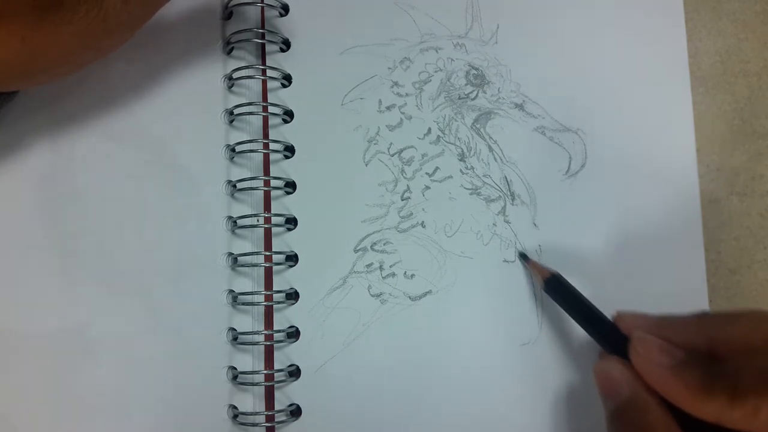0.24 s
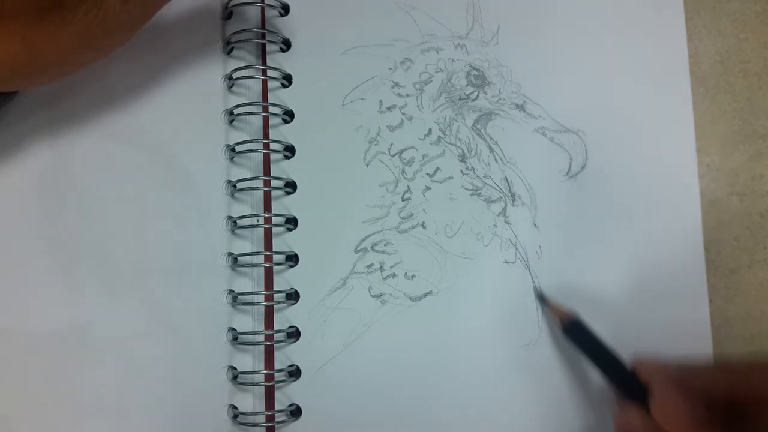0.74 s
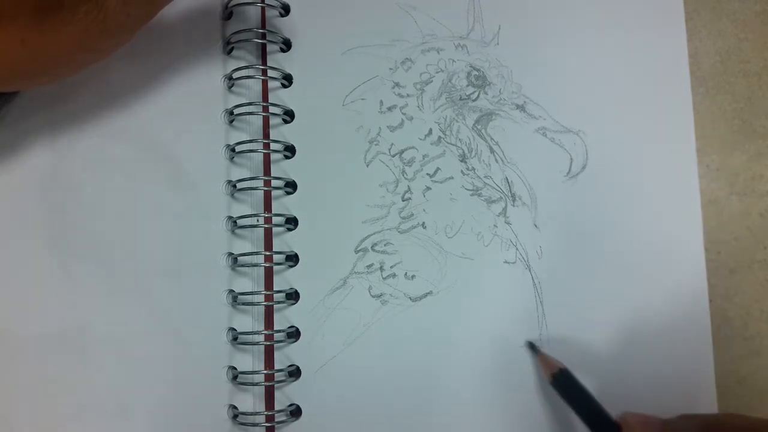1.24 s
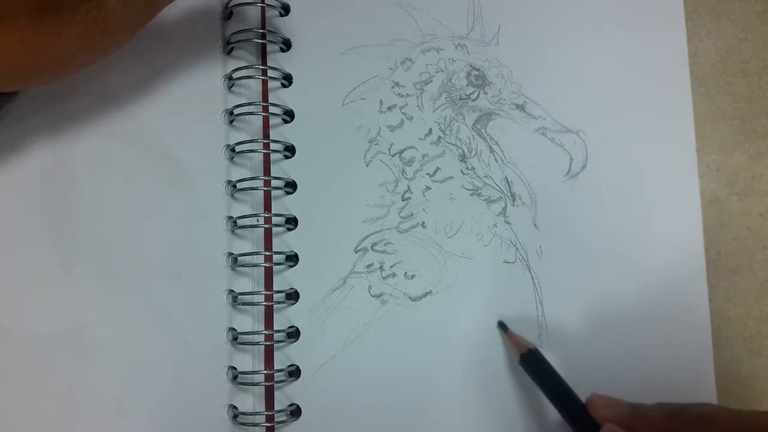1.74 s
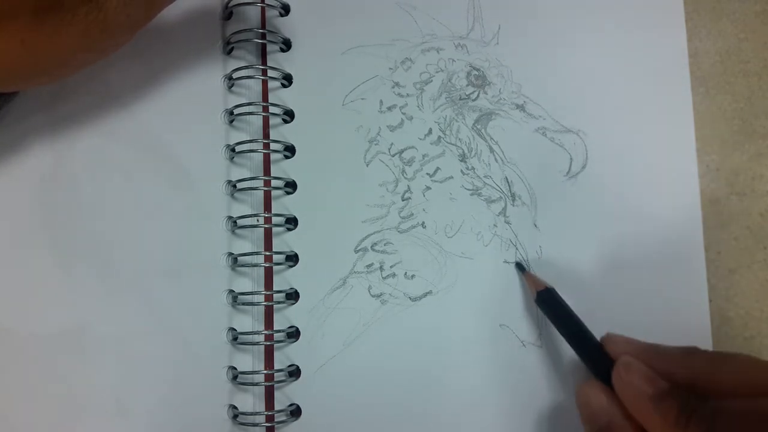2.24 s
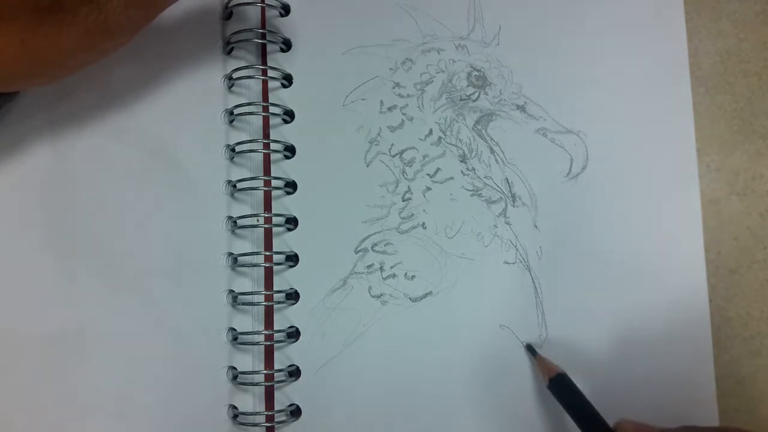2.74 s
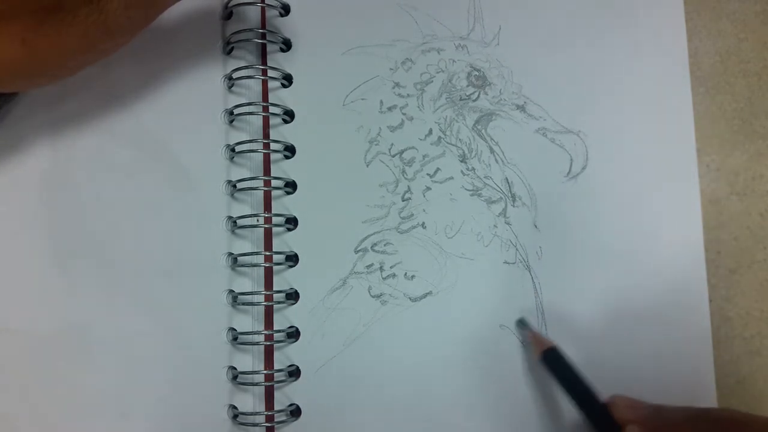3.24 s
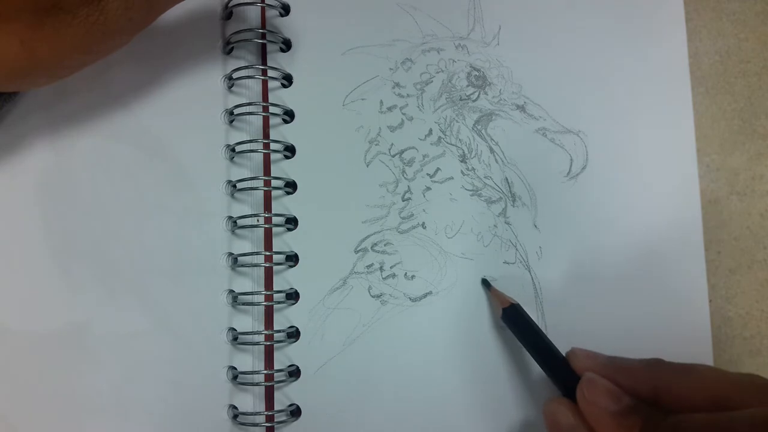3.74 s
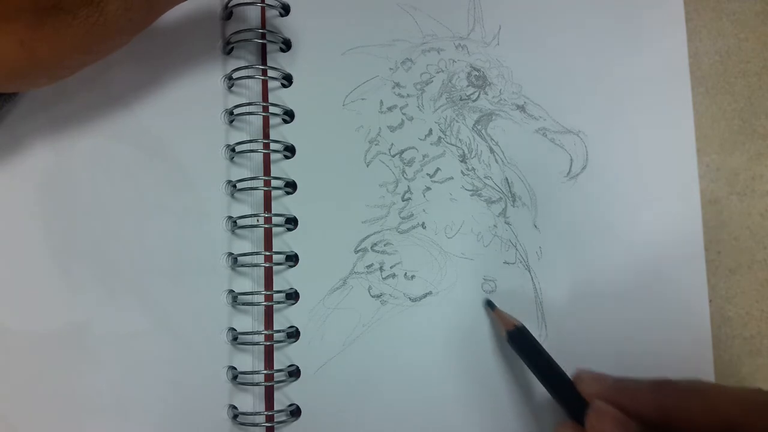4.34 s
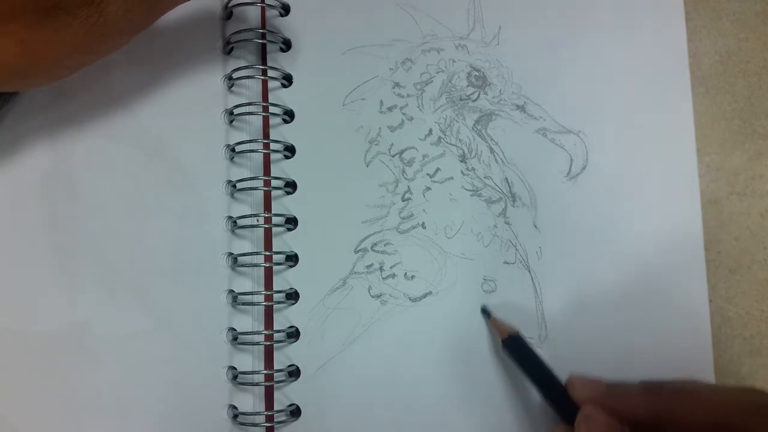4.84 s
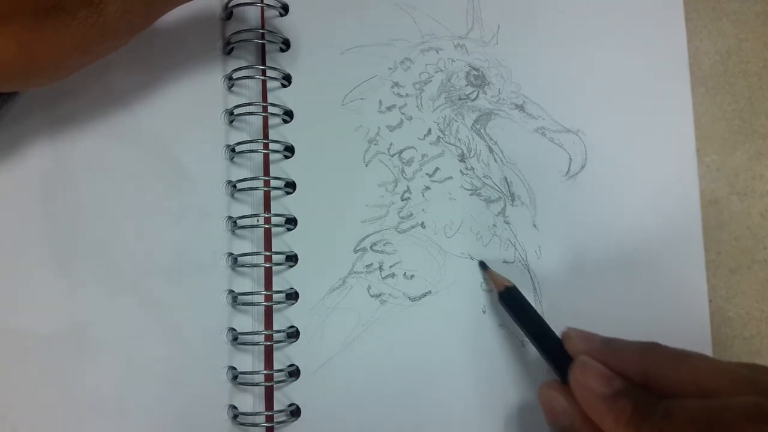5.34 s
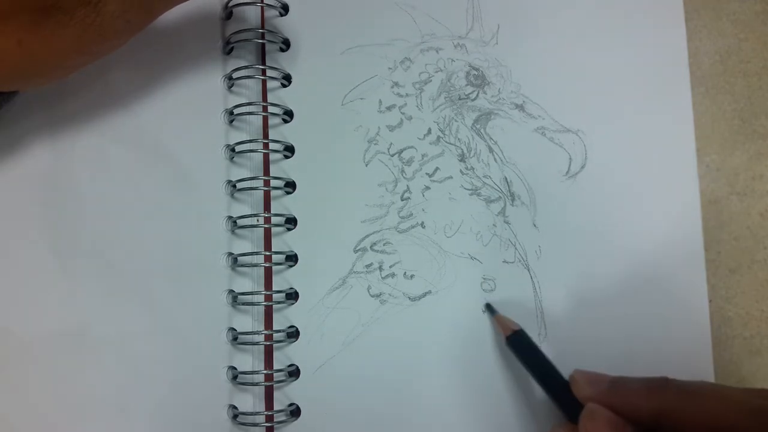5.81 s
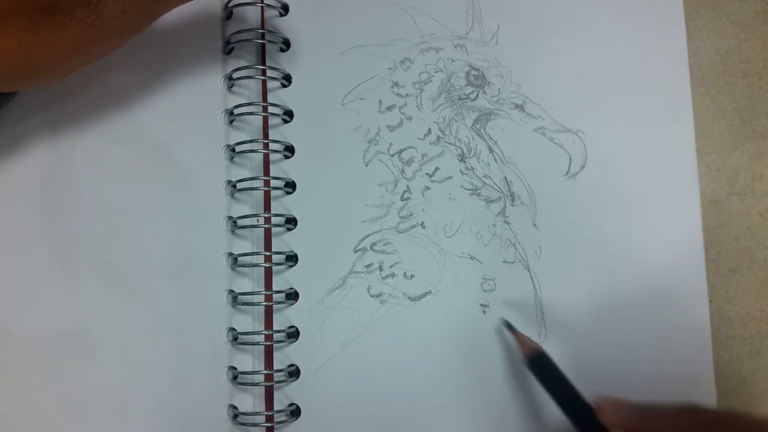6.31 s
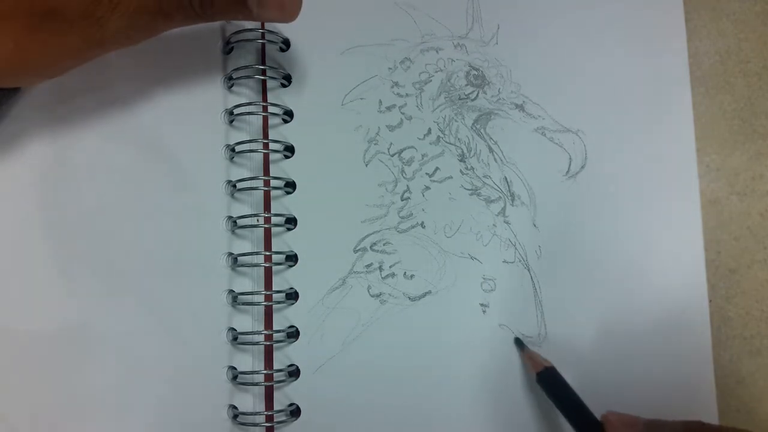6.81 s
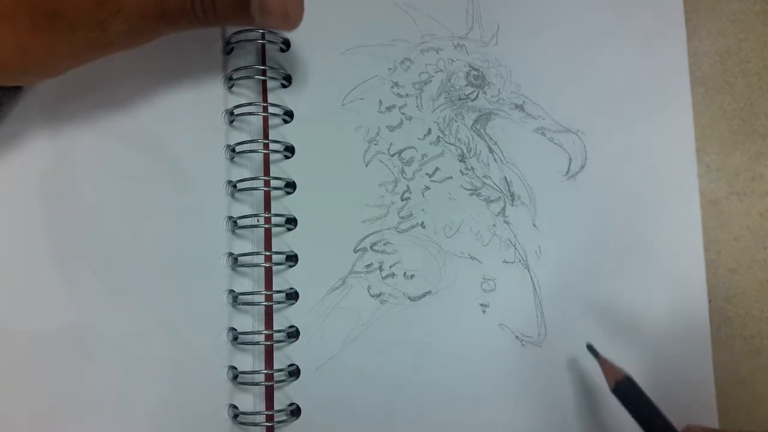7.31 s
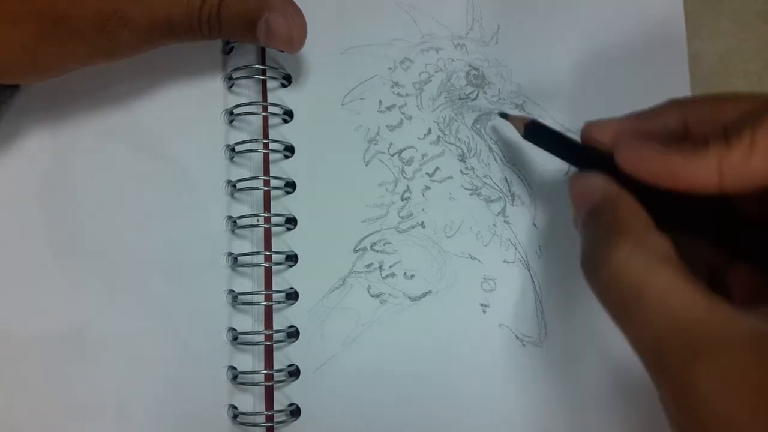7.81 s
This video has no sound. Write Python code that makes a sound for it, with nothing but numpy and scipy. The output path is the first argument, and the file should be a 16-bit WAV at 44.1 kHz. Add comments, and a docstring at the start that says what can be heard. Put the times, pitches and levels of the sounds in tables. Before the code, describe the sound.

Pencil lead whispers over textured paper in short, uneven strokes, close to a small microphone. A longer, stronger scratch stands out before one second and another after two; then come quicker, lighter dabs. The hand brushes softly over the page and a few tiny ticks sound. A low fan hum and soft airy flutter continue throughout the small quiet room.

```python
"""A graphite pencil sketches in short strokes on a page of a spiral-bound book, close to a small microphone.
The lead slips over the paper's tooth: noise filtered into a fine hiss, its resonances shifting
from stroke to stroke, over a dull thrum of the pad. The hand slides on the page as a soft noise rustle,
and a few light ticks ring as damped noise bursts. Behind it all is a quiet room with a short noise tail,
a fan made of filtered noise, and wavering tones of motor and mains."""
import sys
import numpy as np
from scipy import signal
from scipy.fft import rfft, irfft, next_fast_len
from scipy.io import wavfile

SR = 44100
rng = np.random.default_rng(int(sys.argv[2]) if len(sys.argv) > 2 else 0)


def dump_mix(stems):
    """Bounce the given channels to the path in sys.argv[1] as a 16-bit WAV at rate SR."""
    frames = np.atleast_2d(stems).T  # one column per channel
    limited = np.clip(frames, -1, 1)  # hard clip at full scale
    pcm = np.round(limited * 32767).astype(np.int16)
    wavfile.write(sys.argv[1], SR, pcm)


N = 355840  # samples

# Pencil strokes close to the microphone.
# Each row: start in seconds, length in seconds, level in dB before the hiss and thrum offsets.
PENCIL_STROKES = [(-0.048, 0.097, -75), (0.02, 0.17, -70), (0.251, 0.19, -64.5), (0.4, 0.23, -68),
                  (0.631, 0.41, -49.5), (1, 0.207, -68.5), (1.156, 0.149, -65.0), (1.269, 0.158, -60),
                  (1.381, 0.15, -68.5), (1.496, 0.22, -57.5), (1.668, 0.14, -68.5), (1.783, 0.06, -75.0),
                  (2.043, 0.27, -66.5), (2.233, 0.165, -71.5), (2.367, 0.46, -55), (2.72, 0.15, -63),
                  (2.971, 0.11, -60.5), (3.05, 0.16, -69.0), (3.176, 0.15, -59), (3.578, 0.037, -69),
                  (3.587, 0.16, -68), (3.72, 0.17, -63.5), (3.893, 0.15, -62.5), (3.974, 0.1, -70),
                  (4.002, 0.2, -59), (4.129, 0.2, -62), (4.286, 0.11, -64.5), (4.542, 0.059, -72.5),
                  (4.598, 0.13, -69.5), (4.708, 0.083, -68.5), (4.795, 0.093, -72.0), (4.888, 0.11, -71),
                  (4.972, 0.16, -67), (5.088, 0.045, -68.0), (5.124, 0.107, -67.5), (5.214, 0.12, -66.5),
                  (5.312, 0.14, -60), (5.433, 0.1, -62.5), (5.526, 0.058, -70.0), (5.54, 0.18, -73),
                  (5.805, 0.144, -74), (5.907, 0.098, -64.5), (5.997, 0.11, -66.5), (6.084, 0.11, -64),
                  (6.168, 0.1, -69.0), (6.342, 0.23, -67.0), (6.599, 0.091, -73), (6.913, 0.099, -70.5),
                  (7.006, 0.101, -62.5), (7.105, 0.059, -72), (7.173, 0.039, -69), (7.214, 0.038, -71.5),
                  (7.238, 0.049, -72.5)]
# Three resonances of lead and sheet, then an antiresonance.
# Each row: half width in Hz, lift in dB before the grip's depth factor.
LEAD_RESONANCES = [(500, 8.5), (470, 4.5), (630, 9), (424, -5.5)]
# Scrape of the lead under its resonances. Each row: frequency in Hz, relative density in dB per Hz.
SCRAPE_SPECTRUM = [(1500, -2.5), (3600, -17.5), (4600, -22), (5400, -14), (6400, -8.5), (7100, -7),
                   (7700, -11.5), (8800, -2), (12500, -1), (14200, -5), (15700, -4)]
# The pad of paper shaken by the lead. Each row: frequency in Hz, relative density in dB per Hz.
PAD_SPECTRUM = [(200, -18), (450, -6), (650, -5.5), (800, 7), (940, -5.5), (1120, -3.5), (1330, -6.5),
                (1650, -8.5), (2100, -33), (2800, -36), (3900, -38), (5000, -75.5)]
# Skin on paper. Each row: frequency in Hz, relative density in dB per Hz.
SKIN_SPECTRUM = [(400, -7), (1000, 3.5), (2200, 1.5), (2750, -5), (3600, -5), (4600, -13), (7000, -14),
                 (8700, -14.5), (10500, -18.5), (13000, -14), (15500, -23)]
# Light ticks of the pencil and the page. Each row: start in seconds, starting level in dB, ring in Hz.
LIGHT_TICKS = [(1.936, -60, 1950), (3.593, -54, 1400), (5.103, -60.5, 3100), (6.834, -53, 2480),
               (6.905, -62, 3500), (6.983, -58, 3100), (7.588, -68, 8600), (7.984, -66, 12000)]
# Low noise of the fan and the room, before a steeper treble cut.
# Each row: frequency in Hz, relative density in dB per Hz.
RUMBLE_SPECTRUM = [(22, -19), (38, -10), (55, -4), (78, -5), (100, -7.5), (122, -1.5), (150, -2),
                   (168, -6.5), (210, -8), (240, -4), (305, -5.5), (350, -11.5), (420, -20), (520, -49)]
# Hiss of moving air, and on top a faint raised band near 14 kHz. Each row: frequency # in Hz, relative density
# in dB per Hz.
AIR_SPECTRUM = [(330, -25), (470, -0.5), (540, -4), (680, -1), (810, 0), (930, -2.5), (1030, -4.5),
                (1270, -13), (1500, -12), (2400, -27.5), (3000, -35), (3900, -35), (5000, -39.5),
                (13900, -41.5), (14200, -35), (14600, -44)]
# Tones of the mains and the fan motor. Each row: frequency in Hz, level in dB, unsteadiness from 0 to 1.
HUM_TONES = [(29.7, -59.5, 0.7), (59.53, -56, 0.1), (89.7, -64.5, 0.2), (119.1, -55, 0.8),
             (179.7, -62.5, 0.6), (299.7, -50.5, 0.22), (539, -64.5, .4), (565.2, -59.5, 1),
             (598, -57.5, 0.21), (1190, -71.5, 0.4)]
# The hand settles anew for each passage of the drawing.
# Each row: start in seconds, brightness in dB per octave, depth of the resonances as a factor,
# three resonances of lead and sheet in Hz, antiresonance in Hz (all four before the detuning).
HAND_GRIPS = [(-0.1, -6, 1.1, 8500, 12400, 13400, 5900), (0.22, -2.5, 0.9, 9350, 12600, 13650, 15700),
              (1.14, -5, .85, 9740, 11200, 13300, 8270), (1.95, -5, 1.1, 9260, 12550, 14000, 7500),
              (2.92, -7.5, 1.2, 9620, 11500, 13950, 7700), (3.88, -4, 0.78, 9850, 11100, 12800, 10800),
              (4.48, -3, 1.1, 9400, 11200, 14250, 7000), (4.98, -9, 1.1, 8280, 9500, 12800, 15300),
              (5.09, -8, 1.1, 9200, 11700, 14150, 6700), (5.76, -2, 1.3, 8150, 10500, 13300, 14950),
              (6.3, -5, .9, 9400, 11200, 12400, 10000), (6.85, 2, 1.2, 8000, 11280, 13900, 15400)]
# The hand slides to a new place on the page. Each row: start in seconds, length in seconds, level in dB.
HAND_SLIDES = [(.68, 0.46, -66), (2.05, .9, -72.5), (4.95, 0.28, -70), (5.45, 0.4, -73), (6.3, 0.29, -62),
               (6.54, 0.44, -65.5), (7.345, .22, -68), (7.5, 0.53, -64), (7.92, 0.33, -61)]

# The longer the movement, the later in it the hand is fastest: share of its length.
FASTEST_SHARE, FASTEST_SHARE_PER_S, FASTEST_SHARE_MAX = 0.48, 0.43, 0.7
DETUNE = 0.013  # the tip turns a little from stroke to stroke: resonances shift by up to this share
RESTING_DB = -75  # the hand never lies quite still
EDGE_HZ = 15750  # upper band limit at the microphone


def gain_of(db):
    """Decibels to amplitude."""
    return 10 ** (np.asarray(db) / 20)


def evened(x):
    """Scales to unit rms."""
    return x / np.sqrt(np.mean(x ** 2) + 1e-20)


def read(points, hz):
    """A spectrum joined by straight lines over log frequency."""
    f, value = np.transpose(points)
    return np.interp(np.log(hz + 1), np.log(f + 1), value)


def bins(size):
    """Frequencies of the spectrum of a sound of this many samples."""
    return np.fft.rfftfreq(size, 1 / SR)


def colour(x, db):
    """Filters by a gain for each frequency; unit rms."""
    return evened(irfft(rfft(x) * gain_of(db), len(x)))


def drift(hz):
    """Random wandering of unit rms, mostly slower than hz."""
    lowpass = 1 / (1 + (bins(N) / hz) ** 4)
    return evened(irfft(rfft(rng.standard_normal(N)) * lowpass, N))


def add(mix, s, sound):
    """Mixes a sound in at time s, trimmed to the length of the mix."""
    at = round(s * SR)
    sound = sound[max(-at, 0):]
    part = mix[max(at, 0):][:len(sound)]
    part += sound[:len(part)]


def sweep(length):
    """Speed 0-1 of one movement of the hand: it gathers pace, peaks and comes to rest."""
    share = np.arange(0, length, 1 / SR) / length
    fastest = min(FASTEST_SHARE + FASTEST_SHARE_PER_S * length, FASTEST_SHARE_MAX)
    return abs(np.sin(np.interp(share, [0, fastest, 1], [0, np.pi / 2, np.pi])))


def tooth(size, per_s, spread_db, smooth):
    """Tiny slips over paper fibres, a few larger than the rest, on top of even rubbing."""
    slips = (rng.random(size) < per_s / SR) * rng.choice([-1., 1.], size)
    slips *= gain_of(spread_db * np.minimum(rng.exponential(1, size), 4))
    return evened(slips) + smooth * rng.standard_normal(size)


def ripple(hz, strength=0.12, longest_s=0.005):
    """Echoes from the hand, the wire binding and the desk comb the spectrum anew at each call: dB."""
    delays = rng.uniform(longest_s / 10, longest_s, size=5)
    echoes = np.exp(-2j * np.pi * np.outer(delays, hz)).sum(0)
    return 20 * np.log10(abs(1 + strength * echoes))


def scrape(s, hz, lowest_hz=4500):
    """Spectrum of the lead in the grip that holds at time s, tilted above lowest_hz: dB."""
    grip_index = max(sum(grip[0] <= s for grip in HAND_GRIPS) - 1, 0)
    _, bright, depth, *rings_hz = HAND_GRIPS[grip_index]
    tilt = bright * np.log2(np.maximum(hz, lowest_hz) / SR)
    db = read(SCRAPE_SPECTRUM, hz) + tilt + ripple(hz)
    for ring_hz, (width_hz, lift_db) in zip(rings_hz, LEAD_RESONANCES):
        ring_hz = ring_hz * (1 + DETUNE * rng.uniform(-1, 1))
        db = db + depth * lift_db / (1 + ((hz - ring_hz) / width_hz) ** 2)
    return db


def pencil(arch=1.83, hiss_db=1.5, thrum_db=-41.0, thrum_growth=0.27, chatter_db=0.97):
    """Each stroke speeds up and slows down; the hiss follows the speed more steeply than the pad's thrum."""
    out = np.zeros(N)
    friction = tooth(N + SR, per_s=5000, spread_db=1.5, smooth=0.71)
    chatter = gain_of(chatter_db * drift(hz=110))  # the lead presses unevenly
    for start, length, level_db in PENCIL_STROKES:
        speed = sweep(length)
        size = next_fast_len(len(speed))
        hz = bins(size)
        slips = friction[max(round(start * SR), 0):][:size]
        lead = colour(slips, scrape(start + length / 2, hz))[:len(speed)]
        pad = colour(slips, read(PAD_SPECTRUM, hz))[:len(speed)]
        hiss = gain_of(level_db + hiss_db) * speed ** arch * lead
        # the thrum's level varies less from stroke to stroke than the hiss
        thrum = gain_of(thrum_growth * level_db + thrum_db) * speed * pad
        add(out, start, hiss + thrum)
    return out * chatter


def hand(uneven_db=0.9, slide_arch=0.68, follow_db=-18.5):
    """Skin drags over the page with a soft, slightly crackling rustle: in each slide, a little with each stroke."""
    power = np.full(N, gain_of(RESTING_DB) ** 2)
    for start, length, level_db in HAND_SLIDES:
        add(power, start, (gain_of(level_db) * sweep(length) ** slide_arch) ** 2)
    for start, length, level_db in PENCIL_STROKES:
        add(power, start, (gain_of(level_db + follow_db) * sweep(length)) ** 2)
    friction = tooth(N, per_s=1500, spread_db=2.5, smooth=0.72)
    rustle = colour(friction, read(SKIN_SPECTRUM, bins(N)))
    return np.sqrt(power) * gain_of(uneven_db * drift(hz=25)) * rustle


def fan(rumble_db=-46.0, air_db=-51.5, flutter_db=0.9):
    """Low rumble and fluttering air as filtered noise, with mains and motor tones that waver."""
    t, hz = np.arange(N) / SR, bins(N)
    treble_cut_db = 20 * np.log10(1 + (hz / 900) ** 4)
    rumble = colour(rng.standard_normal(N), read(RUMBLE_SPECTRUM, hz) - treble_cut_db)
    air = colour(rng.standard_normal(N), read(AIR_SPECTRUM, hz))
    out = gain_of(rumble_db) * rumble
    out += gain_of(air_db + flutter_db * drift(hz=13.5)) * air
    for tone_hz, db, unsteady in HUM_TONES:
        # complex wandering moves both strength and phase
        waver = 1 + unsteady * (drift(hz=4.9) + 1j * drift(hz=3.4)) / np.sqrt(2)
        turning = np.exp(2j * np.pi * (tone_hz * t + rng.random()))
        out += gain_of(db) * evened((waver * turning).real)
    return out


def room(x, t60=0.33):
    """A short diffuse tail from the desk and walls: decaying noise, starting after 4 ms."""
    t = np.arange(SR // 2) / SR
    tail = rng.standard_normal(len(t)) * gain_of(-60 * t / t60) * (t > 0.004)
    return signal.fftconvolve(x, tail / np.linalg.norm(tail))[:N]


def ticks(t60=0.018, width_hz=750, skirt_db=28, attack_s=0.00055):
    """Each tick is a brief, quickly damped noise burst around one resonance."""
    out, t = np.zeros(N), np.arange(2 ** 11) / SR
    for s, db, ring_hz in LIGHT_TICKS:
        ring_db = -skirt_db * np.log10(1 + ((bins(len(t)) - ring_hz) / width_hz) ** 2)
        ring = colour(rng.standard_normal(len(t)), ring_db)
        envelope = np.minimum(t / attack_s, 1) * gain_of(db - 60 * t / t60)
        add(out, s, envelope * ring)
    return out


def scene(room_db=-17):
    """The drawing sounds close by, in the hum of the room."""
    drawing = pencil() + hand() + ticks()
    return (drawing + gain_of(room_db) * room(drawing) + fan())[None]


def record(dry):
    """The microphone drops the deepest bass; then a steep filter limits the treble."""
    thin = signal.sosfilt(signal.butter(2, 20, "high", fs=SR, output="sos"), dry)
    band_limit = signal.firwin(1023, EDGE_HZ, window=("kaiser", 9), fs=SR)
    return signal.oaconvolve(thin, band_limit[None], "same")


dry = scene()
out = record(dry)
dump_mix(out)
```